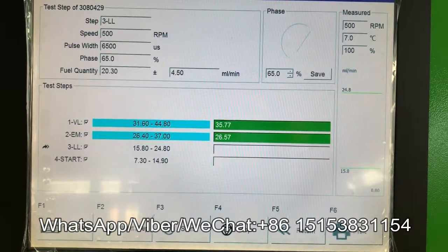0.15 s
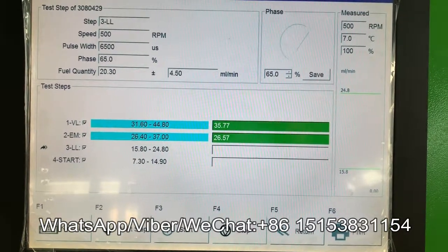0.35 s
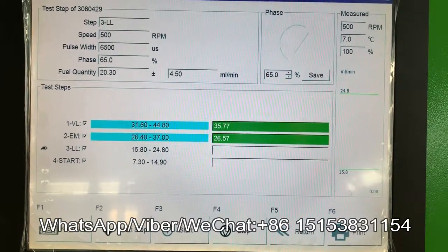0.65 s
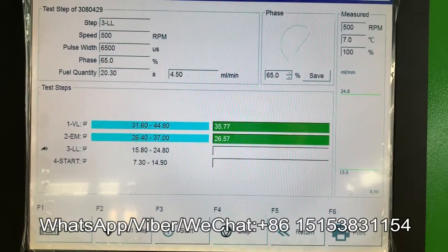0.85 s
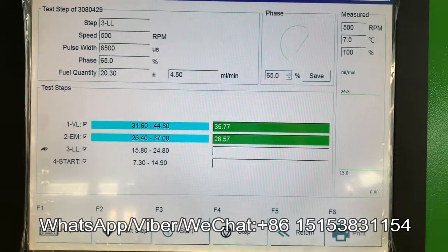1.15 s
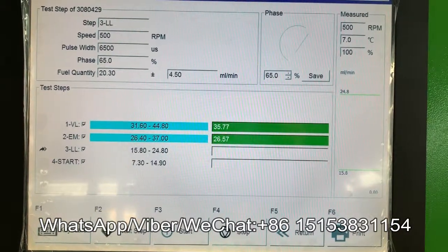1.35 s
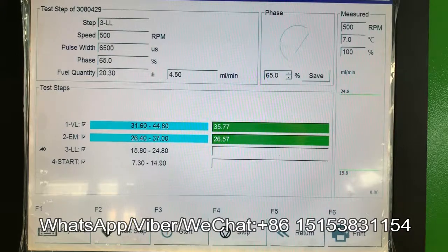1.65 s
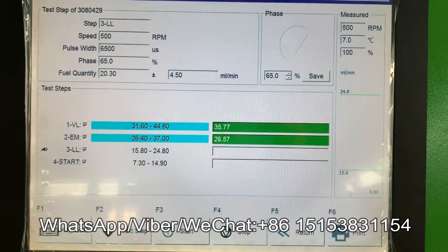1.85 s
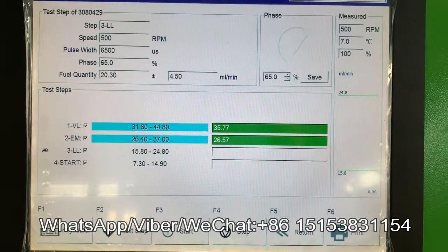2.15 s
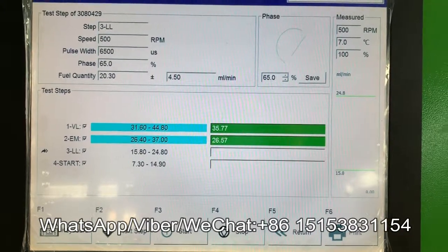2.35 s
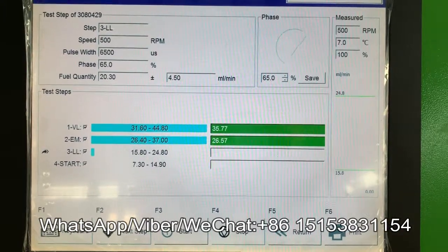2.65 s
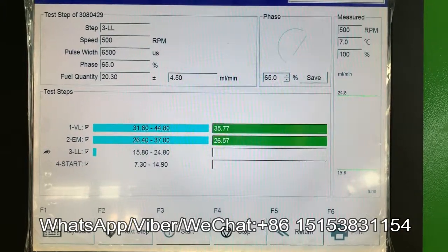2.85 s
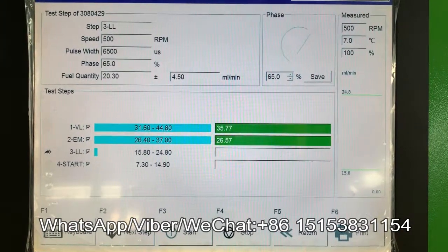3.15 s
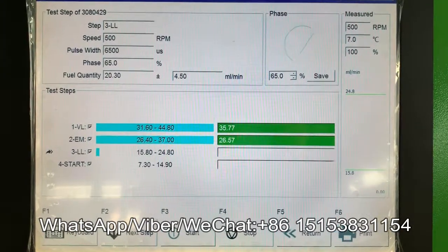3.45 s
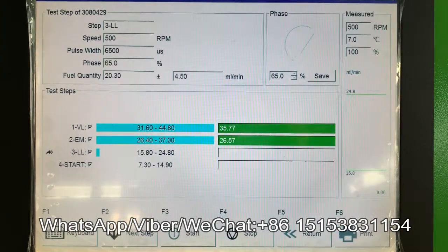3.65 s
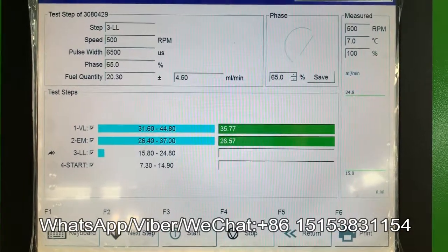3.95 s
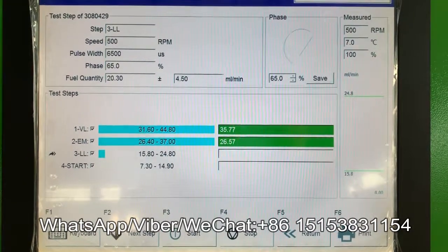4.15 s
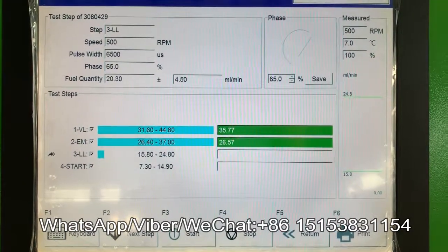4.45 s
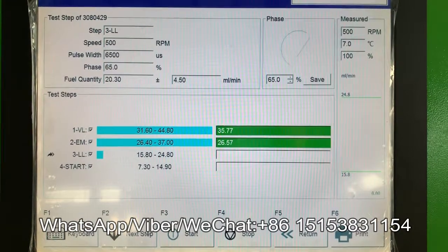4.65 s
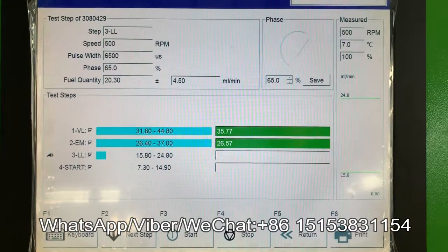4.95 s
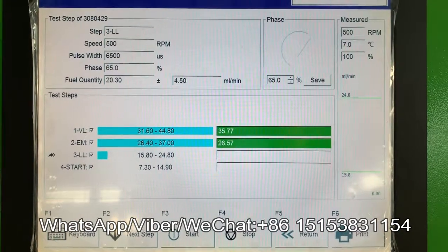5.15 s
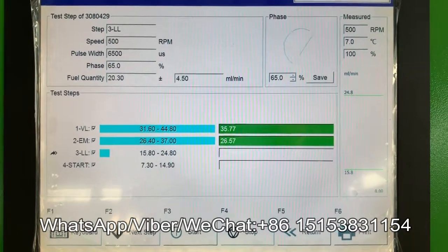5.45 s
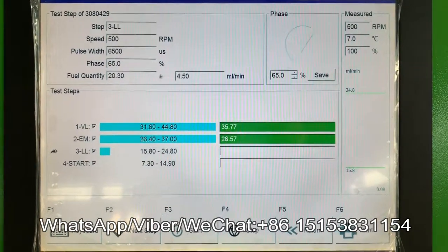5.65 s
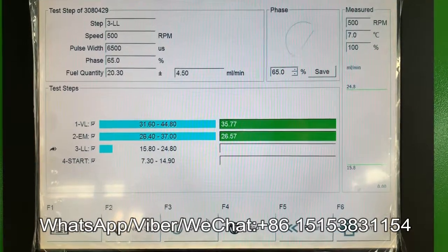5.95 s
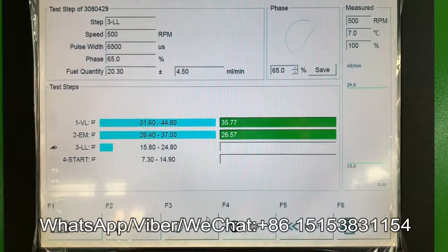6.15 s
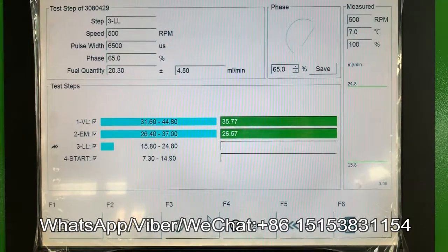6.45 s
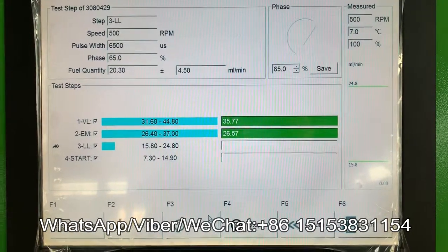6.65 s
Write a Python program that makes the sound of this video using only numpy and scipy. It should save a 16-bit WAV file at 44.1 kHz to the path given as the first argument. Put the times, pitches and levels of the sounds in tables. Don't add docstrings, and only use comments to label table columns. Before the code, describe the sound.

A workshop test bench drives an injector with a turning cam for nearly seven seconds without pause. From the first instant a hard, bright metallic click repeats about 8.4 times a second, each with tiny bounces, a brief swelling fuel hiss and a rattling train of knocks in the steel frame and loose cover. Strokes vary in force, many softer until about 5 s; after 5.3 s the cover buzzes less. A gear whine near 585 Hz wavers every turn, strongest around 3.6 s, then easing. Below lie low shaft and pump hums; very faint high drive whine sits above. Across the shop, air hisses out from 0.6 to about 1.2 s with a low hose boom around 0.8-1.0 s. Faint metal squeaks come at 3.05 and 3.7 s, the latter with a small air puff; another puff fades from 5.6 s. Close stereo microphone, short room echo, rounded peaks.

```python
import sys
import numpy as np
from scipy import signal
from scipy.fft import rfft, irfft, next_fast_len
from scipy.io import wavfile
from scipy.ndimage import map_coordinates

SR = 44100
rng = np.random.default_rng(int(sys.argv[2]) if len(sys.argv) > 2 else 0)


def pcm_store(signal):
    levels = np.round(np.clip(np.atleast_2d(signal), -1, 1) * 32767)
    wavfile.write(sys.argv[1], SR, levels.astype(np.int16).T)


def ratio_of_db(decibels):
    return 10 ** (np.asarray(decibels, float) / 20)


N = 300321


def along(points, hz):
    f, value = np.transpose(points)
    return np.interp(np.log(hz + 1), np.log(f + 1), value)


def wobble(rate):
    knots = rng.standard_normal(int(N * rate / SR) + 4)
    return map_coordinates(knots, [np.arange(N) * rate / SR])


def chance(*size):
    return (rng.standard_normal(size) + 1j * rng.standard_normal(size)) / np.sqrt(2)


# (frequency [Hz], likeness [0 to 1])
DIFFUSE_LIKENESS = [(60, 0.93), (250, 0.94), (500, 1), (1000, 1), (2000, 0.1), (5000, 0.09), (12000, 0.86)]


def rush(spectrum, likeness=DIFFUSE_LIKENESS):
    size = next_fast_len(N)
    hz = np.fft.rfftfreq(size, 1 / SR)
    turn = np.arccos(np.clip(along(likeness, hz), 0, 1)) / 2
    shaped = chance(2, len(hz)) * ratio_of_db(along(spectrum, hz))
    mid, side = irfft(shaped * [np.cos(turn), np.sin(turn)])[:, :N]
    return np.array([mid + side, mid - side]) / np.sqrt(np.mean(mid ** 2 + side ** 2))


STROKE_COUNT = 58
FIRST_S, TURN_S, SPEEDUP_S = -.01083, .119686, 1.33e-6


def stroke_times():
    k = np.arange(STROKE_COUNT)
    return FIRST_S + TURN_S * k - SPEEDUP_S * k * k


def shaft_turns():
    times = stroke_times()
    ends = np.append(times, times[-1] + TURN_S)
    return np.interp(np.arange(N) / SR, ends, np.arange(len(times) + 1))


# (time [s], force [dB])
UNEVEN_STROKES = [(.23, 0.5), (.35, -3), (.59, -3.5), (.71, -3), (.95, -2.5), (1.19, -1.7), (1.43, -3.5),
                  (1.54, -3), (1.78, -2.3), (1.90, -3), (2.14, -4), (2.26, -3.5), (2.38, -3.5),
                  (2.50, -3.5), (2.62, -2.5), (2.74, 0), (2.86, -3), (3.10, -4.5), (3.22, -2.1),
                  (3.34, -0.9), (3.58, 0), (3.70, -1), (4.06, -2.5), (4.30, -3.5), (4.65, -0.2),
                  (4.77, -0.2), (4.89, -0.5), (5.01, 0.1), (5.13, -0.2), (5.25, -2.5)]


def strength_db(part):
    s, force_db = np.transpose(UNEVEN_STROKES)
    force = np.zeros(STROKE_COUNT)
    nearest = abs(stroke_times() - s[:, None]).argmin(axis=1)
    force[nearest] = force_db
    usual_db, gain = part
    return usual_db + gain * force


def ring(times, blows, hz, t60, rise):
    lead = SR // 8
    train = np.zeros((2, N + 2 * lead), complex)
    at = np.round(times.ravel() * SR).astype(int) + lead
    np.add.at(train, (slice(None), at), blows.reshape(2, -1))
    decay = np.log(1000) / np.array([rise, t60])
    poles = np.exp((2j * np.pi * hz - decay) / SR)
    return signal.lfilter([1 - abs(poles[0])], np.poly(poles), train)[:, lead:lead + N].imag


def struck(modes, offsets, strengths, scatter, apart, rise):
    times = stroke_times()[:, None] + offsets
    out = np.zeros((2, N))
    for hz, db, t60, *pan_db in modes:
        habit = np.exp(2j * np.pi * rng.random((2, 1, len(offsets))))
        direct, other = (habit + scatter * chance(2, *times.shape)) * strengths * ratio_of_db(db)
        pair = direct + apart * other * [[[1]], [[-1]]]
        pan = ratio_of_db(sum(pan_db) * np.array([[.5], [-.5]]))
        out += ring(times, pair, hz, t60, rise) * pan
    return out


# (time [s], hold [s], hiss level [dB], fade [dB/s])
AIR_PUFFS = [
    (0.612, 0.52, -27, 32),
    (3.696, .17, -34, 90),
    (5.626, 0.11, -30, 18),
]
PUFF_ATTACK_DB_PER_S, RUMBLE_UNDER_DB = 394, -4.5


def air_db():
    t = np.arange(N) / SR

    def peak(s, hold, db, up, down):
        return db - up * np.clip(s - t, 0, None) - down * np.clip(t - s - hold, 0, None)

    puffs = [peak(s, hold, db, PUFF_ATTACK_DB_PER_S, fade) for s, hold, db, fade in AIR_PUFFS]
    hiss = np.max(puffs, axis=0)
    boom = peak(s=0.82, hold=0.2, db=-24.5, up=60, down=120)
    return hiss, np.maximum(hiss + RUMBLE_UNDER_DB, boom)


# (frequency [Hz], density [dB per Hz])
SHOP_SPECTRUM = [(15, -52), (40, -15), (124, -23), (220, -7), (313, -11), (600, -7.5), (700, -16.5),
                 (1220, -18), (2090, -31), (4860, -44), (6550, -40.5), (9300, -40.5), (12500, -41.5),
                 (14000, -48), (16000, -43)]
# (frequency [Hz], density [dB per Hz])
AIR_HISS_SPECTRUM = [(400, -30), (900, 10), (2000, 1), (3500, -6.5), (6000, -12), (9000, -17), (12400, -12),
                     (16000, -37)]
# (frequency [Hz], density [dB per Hz])
AIR_RUMBLE_SPECTRUM = [(40, -30), (80, -5.5), (150, -2), (290, -7), (450, -34), (900, -60)]
# (time [s], length [s], frequency [Hz], level [dB rms])
METAL_SQUEAKS = [
    (3.045, .06, 4420, -45),
    (3.1, .14, 4420, -51),
    (3.76, .05, 7950, -41),
    (3.69, .2, 7950, -51),
    (3.7, .17, 9400, -44),
    (3.72, .1, 4700, -48),
    (3.72, .18, 5400, -45),
]


def shop():
    t = np.arange(N) / SR
    hiss_db, rumble_db = air_db()
    hiss = ratio_of_db(hiss_db) * rush(AIR_HISS_SPECTRUM)
    rumble = ratio_of_db(rumble_db + 2.1 * wobble(25)) * rush(AIR_RUMBLE_SPECTRUM)
    squeaks = np.zeros(N)
    for s, length, hz, db in METAL_SQUEAKS:
        bell = np.clip(1 - (2 * (t - s) / length - 1) ** 4, 0, 1)
        squeaks += ratio_of_db(db + 1.6 * wobble(40.8)) * bell * np.sin(2 * np.pi * hz * t)
    floor = ratio_of_db(-23.5 + 1.53 * wobble(2.744)) * rush(SHOP_SPECTRUM)
    return hiss + rumble + squeaks + floor


# (frequency [Hz], t60 [s])
WALL_DECAY = [(200, 0.46), (2000, 0.19), (12000, 0.12)]


def walls(x):
    hz, t, z = signal.stft(rng.standard_normal((2, SR // 2)), SR, nperseg=256)
    decay = ratio_of_db(-60 * t / along(WALL_DECAY, hz)[:, None])
    tail = signal.istft(z * decay, SR, nperseg=256)[1]
    return signal.fftconvolve(x, tail / np.linalg.norm(tail[0]), axes=1)[:, :N]


# (multiple of shaft speed, level [dB rms])
SHAFT_ORDERS = [(3, -46), (4, -34.5), (6, -51), (9, -51), (10, -38), (12, -43), (13, -49), (14, -40),
                (16, -46.5), (19, -57), (20, -34.5), (21, -48.5), (24, -42.5)]
# (frequency [Hz], level [dB rms])
PUMP_TONES = [(212, -32), (228.7, -35.5), (286, -38.5)]
# (frequency [Hz], level [dB rms], phase [turns])
DRIVE_TONES = [(13734.6, -60, 0), (13767.8, -59, 0), (13968.3, -54, .2), (14001.9, -52, 0),
               (14035.5, -54, .2), (14236, -62, 0)]


def hum():
    t, turns = np.arange(N) / SR, shaft_turns()

    def tone(cycles, db, sway_db):
        return ratio_of_db(db + sway_db * wobble(6)) * np.sqrt(2) * np.sin(2 * np.pi * cycles)

    shaft = sum(tone(order * turns + rng.random(), db, sway_db=1.0) for order, db in SHAFT_ORDERS)
    pump = sum(tone(hz * t + rng.random(), db, sway_db=.8) for hz, db in PUMP_TONES)
    drive = sum(tone(hz * t + phase, db, sway_db=1.2) for hz, db, phase in DRIVE_TONES)
    return shaft + pump + drive


# (time [s], level [dB rms], lift of the fast half turn [dB])
GEAR_WHINE = [(0, -23, 1.5), (2.5, -22.5, 3), (3.6, -22, 0.2), (5.3, -24, 1.2), (5.6, -24.5, -3.5),
              (6.81, -24.5, -4)]
TEETH = 70
WHINE = (0.17, 1)


def gears():
    turns, t = shaft_turns(), np.arange(N) / SR
    s, db, lift_db = np.transpose(GEAR_WHINE)
    angle = 2 * np.pi * (turns - .27)
    sway = 0.5 * np.sin(angle) + 0.089 * np.sin(2 * angle + 0.98)
    jitter = 0.1 * wobble(11) + 0.05 * wobble(60)
    cycles = TEETH * turns + sway + jitter
    load_db = np.interp(turns - .5, np.arange(STROKE_COUNT), strength_db(WHINE))
    turn_db = np.interp(t, s, lift_db) * np.cos(angle)
    level = ratio_of_db(load_db + np.interp(t, s, db) + turn_db + 1.5 * wobble(9))
    drift = np.array([[.3], [-.3]]) * wobble(3.2)
    return level * np.sqrt(2) * np.sin(2 * np.pi * cycles + drift)


# (frequency [Hz], density [dB per Hz])
SPRAY_SPECTRUM = [(710, -13), (1200, -1.5), (1700, -1), (2030, -8), (2900, -12.5), (5000, -20), (8640, -19),
                  (12500, -24), (16000, -20.5)]
# (frequency [Hz], likeness [0 to 1])
DIRECT_LIKENESS = [(1000, 1), (5000, 0.17), (12000, 0.64)]
SPURT = (1.9, 1.3)


def spray():
    t, times = np.arange(N) / SR, stroke_times()
    stroke = np.searchsorted(times, t) - 1
    u = (t - times[stroke]) / 0.013
    swell = u * np.exp(1 - u) * ratio_of_db(strength_db(SPURT))[stroke]
    return ratio_of_db(-24 + 1.54 * wobble(150)) * swell * rush(SPRAY_SPECTRUM, DIRECT_LIKENESS)


# (time after click [s], low modes [dB], high modes [dB], cover [dB])
KNOCK_TRAIN = [
    (.004, -33, -4.5, 6.5),
    (0.012, -12, 4, 4),
    (0.0216, 0, 4, 3.5),
    (.043, 2, -1.5, 1.4),
    (.051, -3, -4.5, -13),
    (.083, -13, -4, -13.5),
    (.098, -4, -25, -14),
    (.113, -2.5, -6, -4.5),
]
# (frequency [Hz], level [dB], t60 [s])
BODY_MODES = [(232, -26.5, 0.13), (281, -29.5, 0.22), (375, -30, 0.052), (439, -26.5, 0.12),
              (453, -28, .07), (508, -25, 0.088), (612, -41, 0.36), (640, -46, 0.056)]
# (frequency [Hz], level [dB], t60 [s])
PANEL_MODES = [(914, -26.5, 0.074), (944, -24, 0.065), (975, -26.5, 0.049), (1753, -32.5, 0.046),
               (2918, -45, 0.038)]
# (frequency [Hz], level [dB], t60 [s])
COVER_MODES = [(340, -27.5, 0.11), (375, -27.5, 0.11), (730, -27.5, 0.059), (768, -27.5, 0.068),
               (1098, -26, 0.066), (1172, -31, 0.12), (1466, -35, 0.08), (1760, -34.5, 0.049)]
# (time after click [s], frequency [Hz], level [dB], t60 [s], rise [s])
PRESSURE_PUSHES = [
    (.0031, 510, 0, .019, .005),
    (.0232, 600, -6, .022, .005),
]
KNOCK, RATTLE, COVER_UP = (-4.3, 2.2), (1.9, 2.7), (-8, -2.38)
SETTLES_S, SETTLED_DB = 5.3, -3


def frame():
    after, low_db, high_db, cover_db = np.transpose(KNOCK_TRAIN)
    times = stroke_times()
    knock, rattle = ratio_of_db(strength_db(KNOCK))[:, None], ratio_of_db(strength_db(RATTLE))[:, None]
    body = struck(BODY_MODES, after, knock * ratio_of_db(low_db), scatter=0.53, apart=0.44, rise=0.0061)
    panels = struck(PANEL_MODES, after, rattle * ratio_of_db(high_db), scatter=0.64, apart=0.35, rise=0.0026)
    buzz_db = strength_db(COVER_UP) + SETTLED_DB * (times > SETTLES_S)
    buzz = ratio_of_db(buzz_db[:, None] + cover_db)
    cover = struck(COVER_MODES, after, buzz, scatter=0.53, apart=0.27, rise=0.0026)
    vary = ratio_of_db(2.04 * rng.standard_normal(knock.T.shape))
    force = -vary * np.sqrt(knock.T) * np.ones((2, 1))
    pushes = sum(ring(times + s, ratio_of_db(db) * force, hz, t60, rise) for s, hz, db, t60, rise in PRESSURE_PUSHES)
    return body + panels + cover + pushes


# (time after click [s], level [dB])
NEEDLE_BOUNCES = [
    (0, 5.5),
    (.0025, 2),
    (.006, -3.5),
    (.009, -9.5),
    (.043, -79),
]
# (frequency [Hz], level re click [dB], t60 [s], left-right difference [dB])
VALVE_MODES = [(6325, -9, 0.0062, -19.5), (6460, -7.5, 0.016, -7), (6489, -3, 0.01, -5.5),
               (6360, -11, 0.01, -9.5), (7985, -9, 0.0018, -0.5), (12660, -9.5, 0.0091, -10),
               (12420, -8, 0.005, 6), (12360, -13.5, 0.011, 12), (14340, -7.5, 0.0065, 5),
               (15300, -20, 0.013, -27)]
# (frequency [Hz], density [dB per Hz])
SNAP_SPECTRUM = [(1500, -44), (4000, 4.5), (6500, 10.5), (8500, -40), (10500, 45.5), (12600, -6.5),
                 (14300, -6), (15400, -7), (16400, -15)]
CLICK = (-16, 0.21)


def valve():
    after, db = np.transpose(NEEDLE_BOUNCES)
    sizes = ratio_of_db(strength_db(CLICK)[:, None] + db)
    times = stroke_times()[:, None] + after
    envelope = abs(ring(times, 1j * sizes * [[[1]], [[1]]], 0, t60=0.071, rise=0.0033))
    bursts = ratio_of_db(4.5) * envelope * rush(SNAP_SPECTRUM, DIRECT_LIKENESS)
    return struck(VALVE_MODES, after, sizes, scatter=0.43, apart=.15, rise=0.0031) + bursts


def scene():
    click, knocks = valve(), frame() + gears()
    echo = walls(ratio_of_db(-25) * click + ratio_of_db(-11.5) * knocks)
    return click + knocks + echo + spray() + hum() + shop()


def roll_off(x):
    return signal.sosfilt(signal.butter(12, 16800, fs=SR, output="sos"), x)


# (frequency [Hz], lead of the left port [rad])
PORT_LEAD = [(0, 0), (2240, -2.3), (3450, 2.0), (4130, -0.4), (5340, 3.1), (5600, 3.4), (6800, 0.4),
             (7840, -0.1), (9820, -2.8), (10900, -3.2), (13100, -6.0), (14500, -6.6), (15800, -8.9),
             (16400, -9.2)]
# (frequency
# [Hz], gain [dB])
FINAL_FILTER = [(9500, 0), (9900, -24), (10500, -46), (11400, -26), (11800, 0), (15300, 0),
                (15900, -14), (16500, -30), (16800, -90)]


def record(dry):
    size = next_fast_len(N)
    hz = np.fft.rfftfreq(size, 1 / SR)
    lead = np.exp(1j * np.interp(hz, *np.transpose(PORT_LEAD)) * np.array([[.5], [-.5]]))
    response = ratio_of_db(along(FINAL_FILTER, hz))
    x = irfft(rfft(dry, size) * lead * response, size)[:, :N]
    x = x / (1 + np.abs(x / 1.05) ** 4) ** (1 / 4)
    return roll_off(x)


dry = scene()
out = record(dry)
pcm_store(out)
```